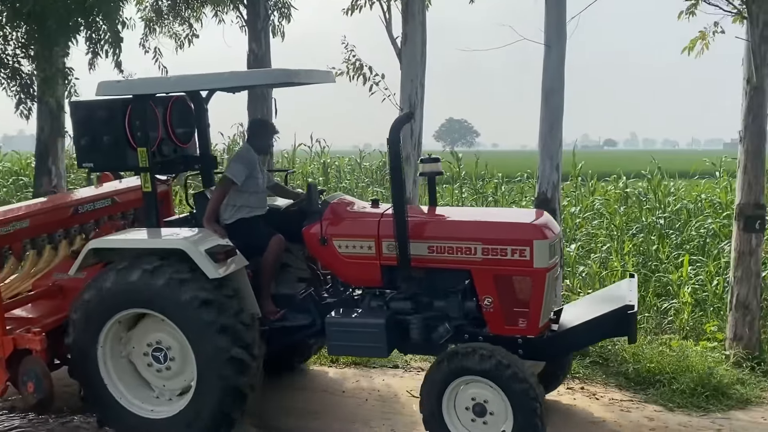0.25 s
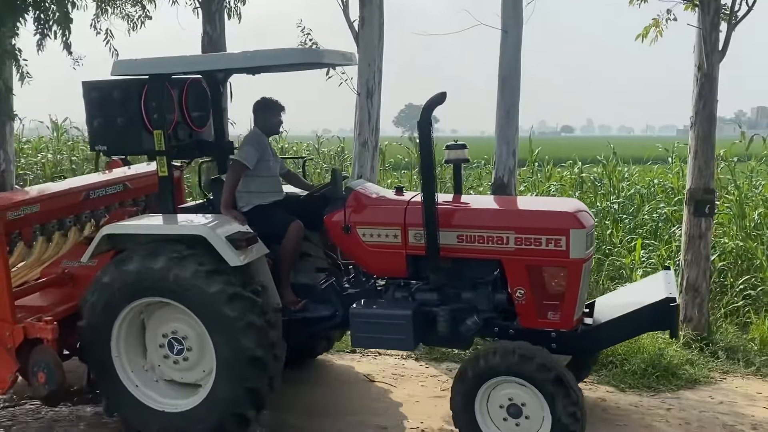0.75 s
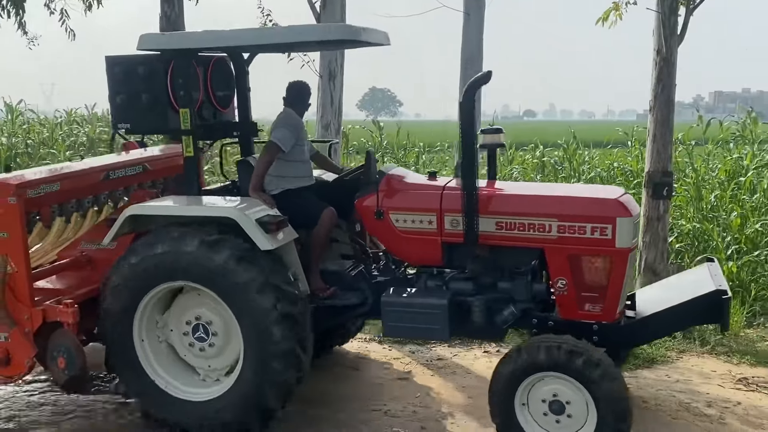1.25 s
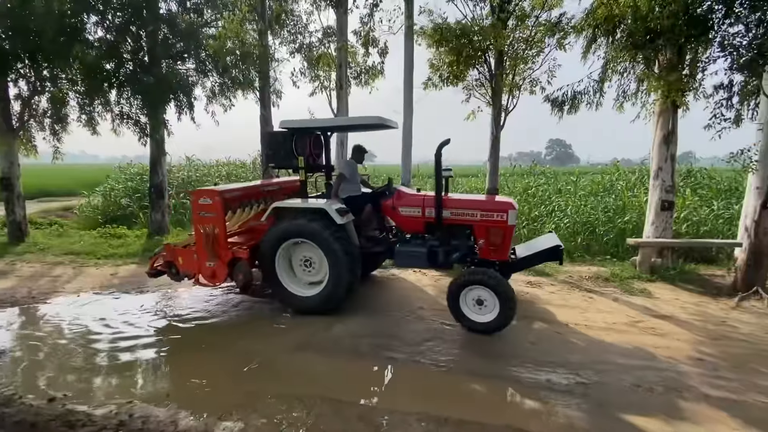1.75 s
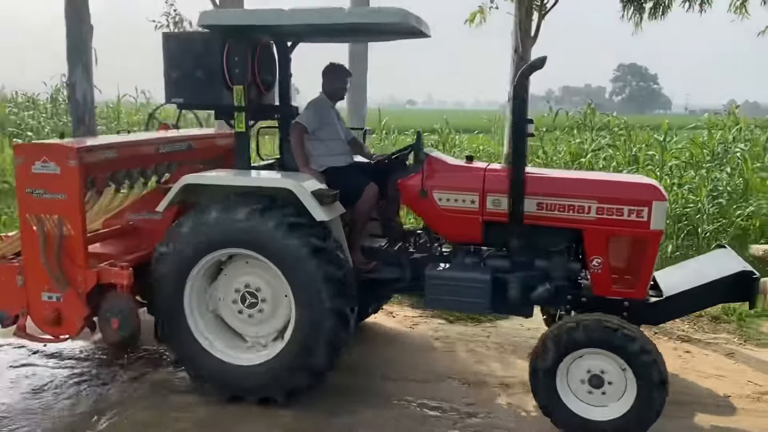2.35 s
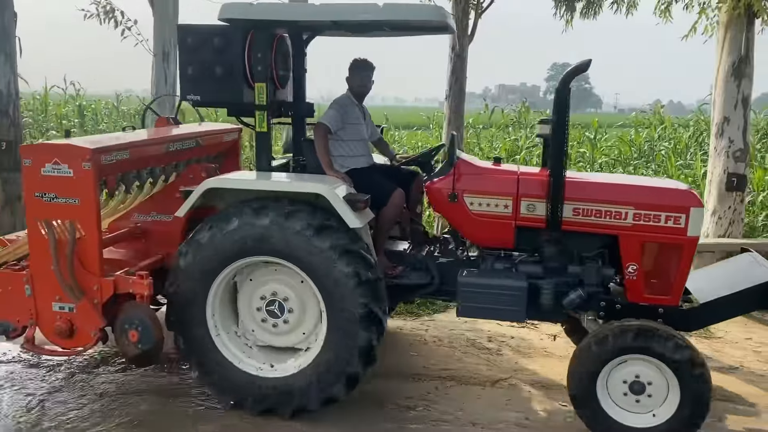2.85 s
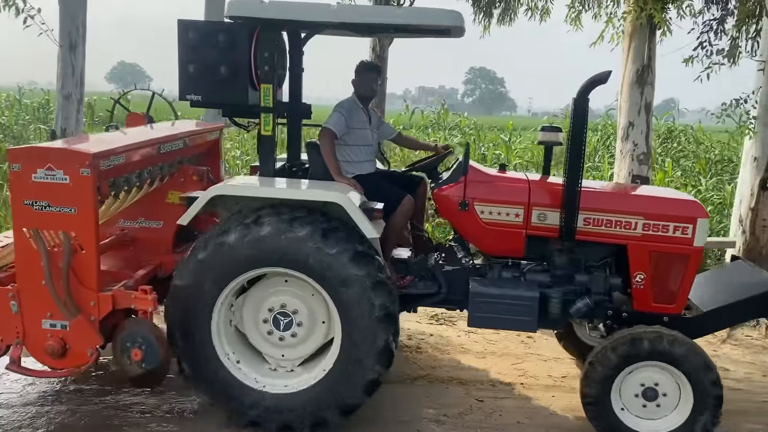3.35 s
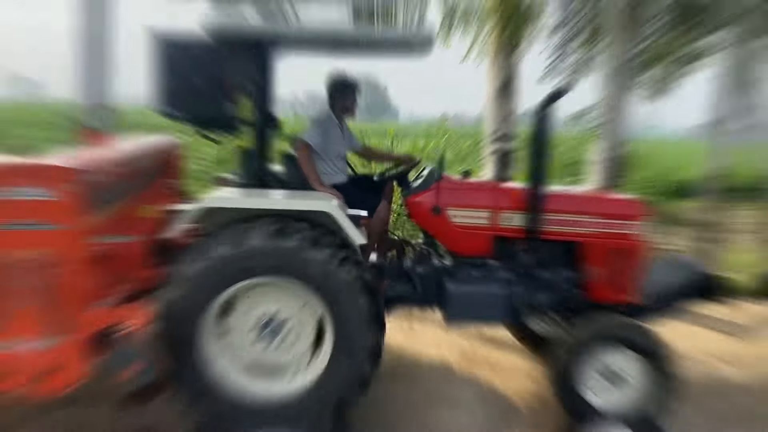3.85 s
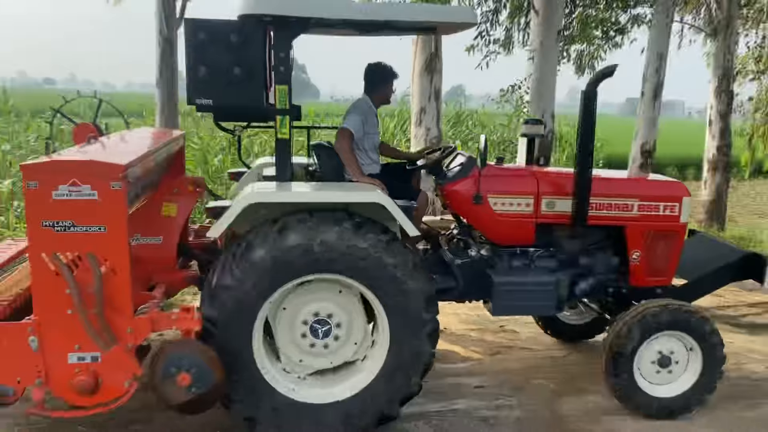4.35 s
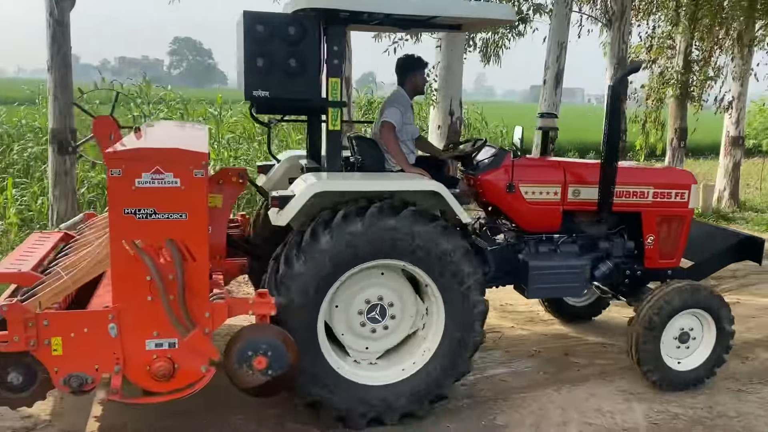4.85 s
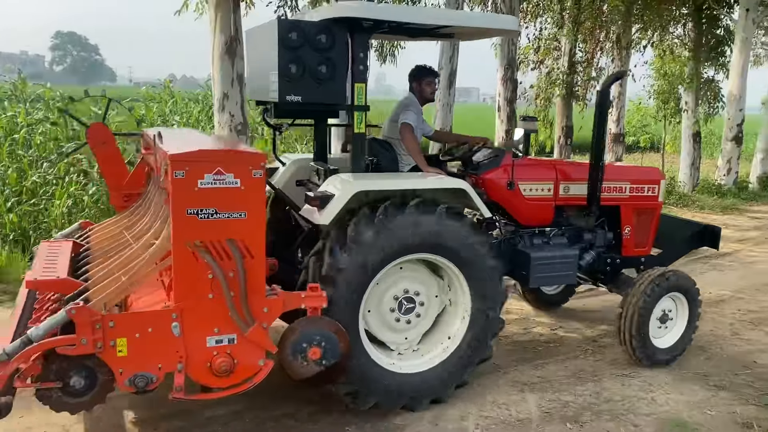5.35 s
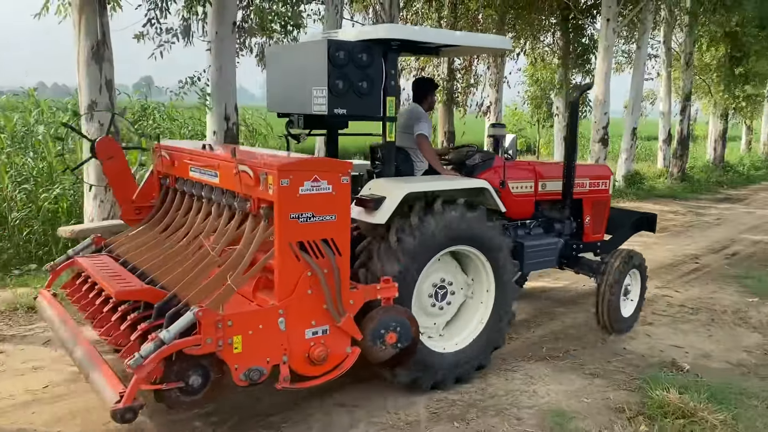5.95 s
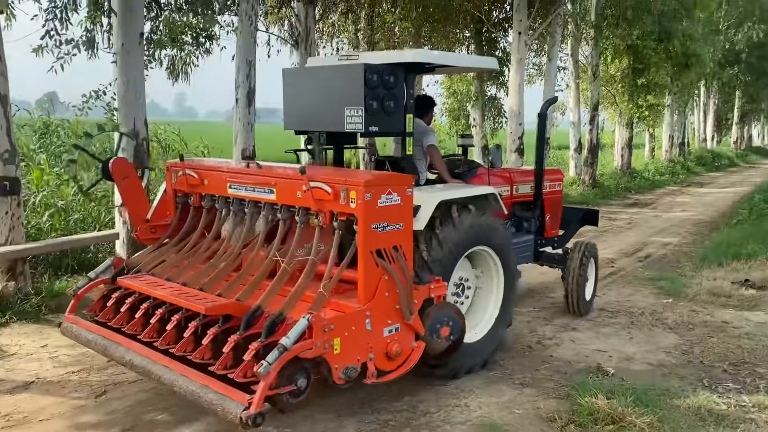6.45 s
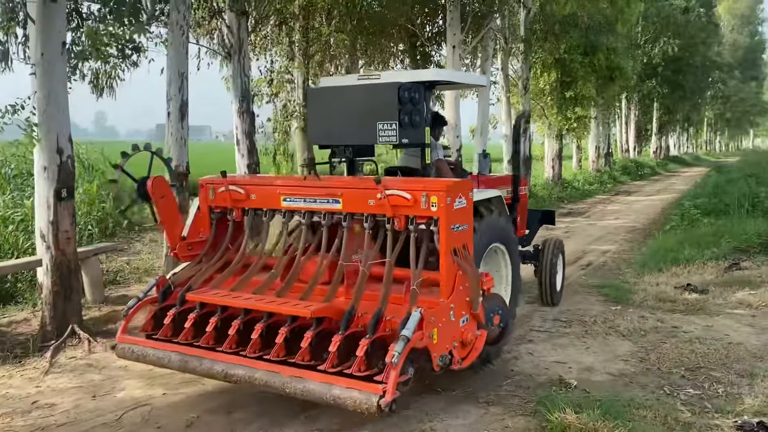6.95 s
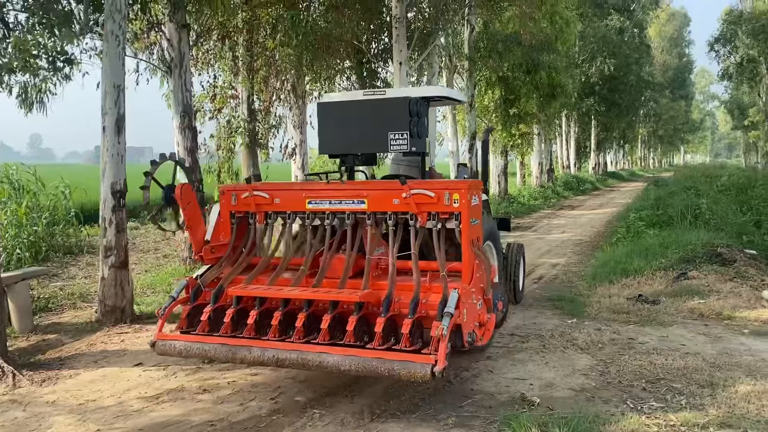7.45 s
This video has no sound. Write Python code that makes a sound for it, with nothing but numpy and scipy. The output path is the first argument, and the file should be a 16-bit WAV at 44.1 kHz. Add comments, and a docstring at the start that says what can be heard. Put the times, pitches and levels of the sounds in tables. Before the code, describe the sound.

A slow diesel engine hunts at low speed, bursts of loud, slightly overloaded metallic knocking alternating with softer coasting. Tyres throw brief soft splashes of puddle water. After a tiny midway gap the engine runs faster, surges less strongly, then hums and chugs steadily with a low exhaust boom. Gears, fan and air whirr throughout, valves tick thinly, and towed steel parts clank near the end. Close stereo phone pickup in open air, no echo.

```python
"""Outdoors, close to a phone's two microphone ports, a three-cylinder diesel tractor crawls past with a seed drill.
At first tyres splash (swells of noise) and the governor hunts: surges of firings knock in the block (noise bursts
through ringing modes) and thud in the exhaust (multiples of the firing rate), then it coasts; loud knocks overload.
Firings quicken around a short cut at 4 s, then settle; the tractor turns away, and late on the drill clanks (rung noise).
Throughout, valves tick (short treble bursts), and gears, fan, pump, tyres, air and spray whirr and hiss (drifting noise)."""
import sys
import numpy as np
from scipy import signal
from scipy.fft import rfft, irfft
from scipy.io import wavfile
from scipy.ndimage import uniform_filter1d

SR = 44100
rng = np.random.default_rng(int(sys.argv[2]) if len(sys.argv) > 2 else 0)


def waveform_to_disk(signal):
    """Save audio, clipped to [-1, 1], as 16-bit WAV at the path in sys.argv[1]."""
    frames = np.transpose(np.atleast_2d(signal))
    scaled = np.clip(frames, -1, 1) * 32767
    samples = np.round(scaled).astype(np.int16)
    wavfile.write(sys.argv[1], SR, samples)


N = 338688

# governor opening the fuel: (start [s], length [s], pipe thud [dB], silencer boom [dB],
# swell from start to end [dB], sizzle re knock, for a knock at 0 dB [dB])
FUEL_SURGES = [(.09, 0.16, -12.5, -16, 8.5, -18), (0.47, .19, -11, -16.5, -1, -17),
               (0.893, 0.11, -8, -13, -1.5, -18.5), (1.444, 0.15, -17.5, -19, -1, -19.5),
               (1.819, .19, -15, -16, -3, -18), (2.093, 0.2, -14, -18, 1, -19),
               (2.626, 0.095, -13, -11.5, 12, -18), (3.289, 0.29, -11, -14.5, 0.5, -20.5),
               (3.733, 0.16, -11, -15, -11, -19.5), (4.046, 0.1918, -12, -14, -0.5, -19.5),
               (4.466, .14, -13.5, -15.5, -5, -23.5), (4.79, 0.12, -16.5, -21.5, -6, -26),
               (5.06, 0.15, -12, -14, -5.5, -23), (5.302, 0.25, -12, -13.5, -3.5, -22)]
# firings that knock hard: (time [s], knock level [dB], knock centre [Hz])
HARD_FIRINGS = [(.049, -14, 1470), (.104, -19, 1810), (.169, -6, 2120), (.238, -17, 1360),
                (.455, -15, 1390), (.507, -11.5, 1560), (.574, -10.5, 1540), (.64, -7, 1400),
                (.73, -14.5, 1370), (.8, -16.5, 1940), (.873, -12, 1400), (.923, -6.5, 1540),
                (.99, -8.5, 1420), (1.2, -16, 1800), (1.268, -10, 1300), (1.334, -13, 1370),
                (1.4, -13, 1520), (1.471, -14, 1330), (1.53, -16, 1430), (1.595, -18, 1590),
                (1.662, -13.5, 1240), (1.731, -11.5, 1240), (1.803, -17, 1750), (1.85, -6, 1510),
                (1.918, -6.5, 1800), (1.984, -8, 1750), (2.052, -15.5, 1330), (2.126, -9, 1650),
                (2.191, -4.5, 1980), (2.252, -5, 1600), (2.536, -12, 1220), (2.599, -12.5, 1690),
                (2.653, -12.5, 1470), (2.708, -9.5, 1870), (2.91, -21, 1600), (3.107, -17, 1260),
                (3.175, -18, 1640), (3.311, -13.5, 1220), (3.359, -15, 1990), (3.418, -12.5, 1800),
                (3.471, -7, 1760), (3.527, -9, 1810), (3.58, -11.5, 1330), (3.706, -12, 1800),
                (3.751, -5.5, 1870), (3.806, -5.5, 2150), (3.861, -9, 1850), (4.032, -15, 1730),
                (4.072, -15, 2140), (4.12, -3.5, 1890), (4.168, -5.5, 1630), (4.214, -10, 1920),
                (4.256, -11.5, 1580), (4.448, -17.5, 1700), (4.501, -19.5, 1510), (4.543, -17, 1610),
                (4.59, -20.5, 1480), (4.635, -20, 1470), (4.721, -15, 1601), (4.856, -18, 1490),
                (5.077, -20, 1757), (5.108, -12, 1760), (5.152, -11.5, 1400), (5.195, -14, 1770),
                (5.326, -18.5, 1510), (5.371, -13, 1760), (5.414, -6.5, 1300), (5.455, -8, 1960),
                (5.496, -11.5, 1640), (5.551, -21, 1350), (5.591, -16, 1340)]
# engine speed: (time [s], firing rate [1/s])
FIRING_RATE = [(0, 15), (3.3, 15), (3.8, 17.5), (4.03, 22), (5.718, 24.6), (6.2, 24.4), (6.4, 23.6),
               (6.7, 23.8), (7.2, 23.9), (7.68, 24.3)]
# engine between and after the surges: (time [s], knock [dB], pipe thud [dB], silencer boom [dB],
# whirr [dB], hiss [dB])
STEADY_LEVELS = [(0, -43, -25, -34, -21.5, -32.5), (.8, -37, -26, -30, -21, -31.5),
                 (1.25, -15, -19, -28.5, -20.5, -34), (1.75, -22, -29, -27, -18, -28.5),
                 (2.4, -33, -23.5, -31, -20.5, -34.5), (2.95, -36, -25, -30, -21, -35),
                 (3.65, -30, -22, -27, -18, -31), (4.33, -28, -23, -31.5, -21.5, -37),
                 (4.7, -19.5, -18.5, -25.5, -18.5, -34.5), (5.25, -22, -25, -24.5, -17, -34.5),
                 (5.7, -16.5, -16.5, -20.5, -17.5, -33), (6.1, -20.5, -20, -21.5, -21.5, -38.5),
                 (6.6, -22, -20, -27, -20, -37), (6.95, -32.5, -19, -26, -21.5, -39.5),
                 (7.3, -23.5, -13.5, -20.5, -18.5, -35), (7.68, -22.5, -18.5, -31, -20.5, -41.5)]
# ringing of the engine block: (frequency [Hz], width [Hz], level [dB])
BLOCK_MODES = [(619, 99, 5), (797, 80, -6.5), (1080, 120, 4), (1270, 92, 1), (1500, 166, -3.5),
               (1790, 176, -1.5), (2012, 68, 3), (2297, 120, 6.5), (2620, 110, 1.5), (3130, 340, -10),
               (3450, 300, 1)]
# treble colour of knocks and valve ticks: (frequency [Hz], level [dB])
SIZZLE_COLOUR = [(2500, -32), (3500, -4), (5000, -9.5), (7500, -4), (9000, -17), (10800, -3.5),
                 (13000, -17.5), (16000, -25)]
# exhaust pipe resonances: (frequency [Hz], width [Hz], relative level [dB])
PIPE_MODES = [(47.7, 7.8, 6), (71.7, 8.6, -4.5), (95, 11.6, -12.5), (182, 47, -10)]
# silencer resonances, each passed twice: (frequency when cool [Hz], width of one pass [Hz], relative level [dB])
SILENCER_MODES = [(246, 21.3, 10.5), (335.5, 103, -12), (403.5, 75, -10.5)]
# modes heard as the tractor turns its side and then its back, each passed twice:
# (frequency [Hz], width of one pass [Hz], relative level [dB])
TURNING_MODES = [(145, 17, 0), (102.5, 48, -4.5), (495.2, 47, 1.5)]
# the turn: (time [s], first two turning modes re thud [dB], third mode re boom [dB],
# shading of the engine by the drill [dB])
TURN_LEVELS = [(0, -13.5, -20, -1), (2.5, -9.5, -19, 0.5), (4.3, -9, -12.5, -2), (4.6, -7, -5, -3),
               (6.1, -7, -4.5, -2.5), (6.4, -6, -23, -3.5), (6.9, -2.5, -22, -1.5), (7.68, 0, -15, -7)]
# whirr of gears, fan, pump and tyres: (frequency [Hz], relative density [dB per Hz])
WHIRR_COLOUR = [(30, -58), (55, -2.5), (110, -11), (220, -12), (380, -11), (520, -17.5), (620, -26),
                (760, -21.5), (1080, -17), (1600, -20.5), (2300, -21.5), (2800, -26), (3200, -39),
                (3750, -32), (4400, -45.5), (8000, -73)]
# air and spray: (frequency [Hz], relative density [dB per Hz])
HISS_COLOUR = [(2500, 1.5), (4000, 0), (6000, -5), (8000, -5.5), (8900, -35), (9900, -12), (11000, -15.5),
               (12300, -21), (13200, -40), (16000, -38)]
# steel drill parts meeting: (time [s], ring level [dB], ring frequency [Hz], decay by 60 dB [s], scrape level [dB])
DRILL_CLANKS = [(6.81, -26, 2290, 0.068, -52), (6.84, -28, 2340, .07, -48), (6.868, -25, 2246, 0.051, -33),
                (6.912, -25, 2280, 0.056, -47), (7.418, -35, 10800, 0.24, -29)]
# tyres throwing puddle water: (time [s], peak level [dB], length [s])
PUDDLE_SPLASHES = [(0.09, -29, 0.067), (1.424, -25.5, 0.062), (2.047, -22.5, 0.094), (2.418, -21, 0.041),
                   (2.612, -19, 0.039)]
# likeness of the two microphone ports: (frequency [Hz], left-right likeness [0-1])
PORT_LIKENESS = [(60, 1), (130, 0.98), (290, 0.98), (640, 0.91), (1420, 0.76), (3130, 0.6), (5000, 0.71),
                 (8000, 0.69), (12000, 0.36)]
# level lean between the ports: (frequency [Hz], left minus right [dB])
PORT_LEAN = [(60, -2), (130, -2.0), (290, -2.0), (640, -1.0), (1420, 1), (3130, 2.5), (5000, 3.5),
             (8000, 0.5)]
# phase lead between the ports: (frequency [Hz], left ahead of right [rad])
PORT_LEAD = [(0, 0.79), (1120, 0.2), (1980, -0.72), (2500, 0.42), (3270, -1.5), (5000, -0.82),
             (8000, -1.48), (12000, -1.2)]
# short cut in the sound: (time [s], gain [ratio])
CUT_GAIN = [(0, 1), (3.9, 0.99), (3.961, 0.43), (3.963, 0.01), (4.008, 0.0014), (4.03, 0.43), (4.07, 1),
            (7.68, 0.84)]

SPAN = 8192  # samples in one burst
HZ = np.fft.rfftfreq(SPAN, 1 / SR)
STEP = 64  # samples between the points where the exhaust is computed
BAND_LIMIT_HZ = 15700
SETTLED_S = 5.718  # from here the engine runs evenly
FUEL_RISE_S, FUEL_FALL_S = 0.03098, 0.03
EARLY_S = 0.012  # a fuelled firing knocks this much sooner in its cycle
SOFT_HZ, SOFT_FALL_HZ_PER_S = 1590, 66  # centre of soft knocks, duller as the tractor turns away
COAST_SIZZLE_DB = -30.5  # sizzle re knock without fuel
SIZZLE_LAG = 0.28  # under fuel, sizzle re knock drops this many dB per dB of knock
BLOCK_LATE_S, BLOCK_LATE_HZ = 0.005004, 1490  # heavy parts, ringing below this frequency, answer a blow later
THUD_LATE_S, THUD_LINGER_S, BOOM_LINGER_S = 0.023, 0.047, 0.004  # long pipe fills late; exhaust outlasts fuel
WHIRR_LIFT_DB, HISS_LIFT_DB, LIFT_LATE_S = 2.5, 3.5, 0.049  # gears and fan work harder under fuel
SHAKE_DB = 4.5  # how much each firing shakes up the gears


def firings():
    """Soft firings share out the gaps between hard ones, then follow the settled rate; fuel sets sizzle, thud and boom."""
    hard_s = np.transpose(HARD_FIRINGS)[0]
    crank_s = np.r_[hard_s + EARLY_S * fuel(hard_s), SETTLED_S]
    gaps = np.diff(crank_s)
    expected = gaps * np.interp(crank_s[1:], *np.transpose(FIRING_RATE))
    counts = np.maximum(np.round(expected), 1).astype(int)
    between = np.concatenate([start + gap * np.arange(1, count) / count
                              for start, gap, count in zip(crank_s, gaps, counts)])
    turns = np.cumsum(curve(FIRING_RATE) * (np.arange(N) >= SETTLED_S * SR)) / SR
    settled = np.flatnonzero(np.diff(np.ceil(turns))) / SR
    first = crank_s[0] - 1 / FIRING_RATE[0][1]
    soft_s = np.r_[first, between - EARLY_S * fuel(between), settled]

    at, steady_knock_db, steady_thud_db, steady_boom_db = np.transpose(STEADY_LEVELS)[:4]
    soft_db = np.interp(soft_s, at, steady_knock_db)
    soft = np.transpose([soft_s, soft_db, SOFT_HZ - SOFT_FALL_HZ_PER_S * soft_s])
    soft = soft + rng.standard_normal((len(soft_s), 3)) * [0.0006, 0.9, 90]  # chance in s, dB, Hz
    rows = np.vstack([HARD_FIRINGS, soft])
    s, knock_db, centre_hz = rows[np.argsort(rows[:, 0])].T

    share, run = opening(s)
    surge_thud_db, surge_boom_db, swell_db, sizzle_db = np.transpose(FUEL_SURGES)[2:, :, None]
    fuelled_db = sizzle_db - SIZZLE_LAG * knock_db
    treble_db = COAST_SIZZLE_DB + (share * (fuelled_db - COAST_SIZZLE_DB)).sum(0)

    def exhaust_level(steady_db, surge_db, late, linger):
        lean_db = np.interp(s, at, steady_db)
        swollen_db = surge_db + swell_db * (run - 0.5)
        return lean_db + (opening(s - late, linger)[0] * (swollen_db - lean_db)).max(0)

    thud_db = exhaust_level(steady_thud_db, surge_thud_db, THUD_LATE_S, THUD_LINGER_S)
    boom_db = exhaust_level(steady_boom_db, surge_boom_db, 0, BOOM_LINGER_S)
    uneven_db = rng.standard_normal((len(s), 3)) * [1.6, 0.9, 1.2]
    return s, knock_db, centre_hz, *(np.array([treble_db, thud_db, boom_db]) + uneven_db.T)


def opening(t, linger_s=0):
    """How far the fuel is open in each surge at times t, 0 to 1, and how far the surge has run, 0 to 1."""
    start, length = np.transpose(FUEL_SURGES)[:2, :, None]
    rise = (t - start) / FUEL_RISE_S + 0.5
    fall = (start + length + linger_s - t) / FUEL_FALL_S + 0.5
    return np.clip(np.minimum(rise, fall), 0, 1), np.clip((t - start) / length, 0, 1)


def fuel(t):
    """Fuel opening of the most open surge at times t."""
    return opening(t)[0].max(0)


def knocks(s, knock_db, centre_hz, treble_db):
    """Combustion hits the block, then the piston slaps its bore; fuelled blows sizzle brightly, unfuelled ones faintly."""
    count = len(s)
    blow = ports(*bursts(count, 0.0028, 0.014, 0.026, -6.5, 2.46), HZ) * block(centre_hz, 3.8)
    slap = ports(*bursts(count, 0.0025, 0.008, 0.02, -10, 3.5), HZ) * block(0.8 * centre_hz, 4.0)
    slap_late = rng.uniform(0.3, 0.52, count) * np.gradient(s)  # a share of the firing cycle
    slap_weaker_db = 9.4 + 6.7 * rng.exponential(size=count)
    sizzle = ports(*bursts(count, 0.008, 0.013, 0.024, -8, 1.1), HZ) * amp(read(SIZZLE_COLOUR, HZ))
    return (place(s - 0.0045, blow, knock_db, 0.016)
            + place(s + slap_late, slap, knock_db - slap_weaker_db, 0.021)
            + place(s - 0.007, sizzle, knock_db + treble_db, 0.034))


def block(centre_hz, spread_db):
    """Each blow excites the block's modes by other amounts, around its centre; cast iron passes little treble."""
    hz, width, db = np.transpose(BLOCK_MODES)
    uneven_db = spread_db * rng.standard_normal((len(centre_hz), len(hz)))
    off_centre_db = 15.4 * np.log2(hz / centre_hz[:, None]) ** 2
    share = amp(db + uneven_db - off_centre_db)
    modes = np.array([ring(f, w) for f, w in zip(hz, width)])
    delay_s = BLOCK_LATE_S / (1 + (HZ / BLOCK_LATE_HZ) ** 4)
    late = np.exp(-2j * np.pi * np.cumsum(delay_s) * SR / SPAN)
    return share @ modes * late / (1 + 1j * HZ / 5200) ** 6


def exhaust(s, thud_db, boom_db):
    """Multiples of the firing rate sound where pipe and silencer ring; hot gas and a warming pipe lift the boom's pitch."""
    t = np.arange(N) / SR
    coarse = t[::STEP]
    turns = np.interp(t, np.r_[s, s[-1] + 1], np.r_[np.arange(len(s)), len(s) + 23])
    rate = smooth_twice(np.gradient(turns), 4400)  # the flywheel evens the crank speed
    turns = np.cumsum(rate) + 0.0547
    order = np.arange(1, 27)[:, None]
    hz = order * rate[::STEP] * SR
    thud_db = np.interp(coarse, s + 0.024, thud_db)
    boom_db = np.interp(coarse, s + 0.024, boom_db)

    gas_heat = 0.0038 * (smooth_twice(boom_db, 60) + 11.0)
    pipe_heat = 0.0068 * (coarse - 4) + 0.029 * np.maximum(coarse - 6.2, 0)
    heat = 1 + gas_heat + pipe_heat
    pipe = sum(amp(db) * ring(f, w, hz) for f, w, db in PIPE_MODES) / (1 + 1j * hz / 150)
    silencer = sum(amp(db) * ring(f * heat, w, hz) ** 2 for f, w, db in SILENCER_MODES) / (1 + 1j * hz / 900)
    # even out the resonances, so that thud and boom levels set the loudness
    pipe, silencer = (r / np.sqrt((abs(r) ** 2).sum(0) / 2) for r in (pipe, silencer))

    *backs, side = (amp(db) * ring(f, w, hz) ** 2 for f, w, db in TURNING_MODES)
    back = amp(curve(TURN_LEVELS)[::STEP]) * sum(backs)
    side = amp(curve(TURN_LEVELS, column=2)[::STEP]) * side
    lines = -amp(thud_db) * (pipe + back) - amp(boom_db) * (silencer + side)
    # turbulence makes each multiple waver, the higher ones more
    waver = uniform_filter1d(rng.standard_normal((2,) + hz.shape), size=36, axis=2) * 6
    lines = lines * (1 + (0.07 + 0.009 * order) * (waver[0] + 1j * waver[1]))
    sound = sum((np.interp(t, coarse, line) * np.exp(2j * np.pi * k * turns)).real
                for k, line in zip(order, lines))
    spectrum = rfft(sound)
    return irfft(ports(spectrum, 2.1j * spectrum, np.fft.rfftfreq(N, 1 / SR)), N)


def valves(s):
    """A valve seats with a thin tick between firings."""
    at = s[:-1] + 0.41 * np.minimum(np.diff(s), 0.08)
    colour = amp(read(SIZZLE_COLOUR, HZ)) * ring(11200, 3200) ** 2
    tick = ports(*bursts(len(at), 0.0021, 0.0052, 0.022, -2), HZ) * colour
    shade_db = 0.55 * curve(TURN_LEVELS, column=3)[(abs(at) * SR).astype(int)]
    return place(at, tick, -47 + shade_db + 2.4 * rng.standard_normal(len(at)), 0.021)


def whirr(s):
    """Gears, fan and pump below, shaken up by each firing; air and spray above."""
    t = np.arange(N) / SR
    cycle = np.interp(t - 0.004, s, np.arange(len(s))) % 1
    shake_db = uniform_filter1d(SHAKE_DB * (0.5 - cycle), size=250)
    load = fuel(t - LIFT_LATE_S)
    gears_db = curve(STEADY_LEVELS, column=4) + WHIRR_LIFT_DB * load + shake_db
    hiss_db = curve(STEADY_LEVELS, column=5) + HISS_LIFT_DB * load
    gears = patchy(WHIRR_COLOUR, gears_db, 2.53, 1.43, curve(TURN_LEVELS, column=3))
    return gears + patchy(HISS_COLOUR, hiss_db, 2.5, 1.0)


def drill():
    """Steel parts of the drill in tow meet: a scrape of noise and one ringing mode."""
    s, db, hz, t60, scrape_db = np.transpose(DRILL_CLANKS)
    blow = ports(*bursts(len(s), 0.0013, 0.0089, 0.033, -1), HZ)
    width = np.log(1000) / np.pi / t60[:, None]
    rings = blow * ring(hz[:, None], width)
    return place(s, rings, db, 0.035) + place(s, blow * ring(2200, 4600), scrape_db, 0.023)


def splashes():
    """Tyres throw puddle water: soft swells of treble noise."""
    t = np.arange(N) / SR
    swell = sum(amp(db) * np.exp(-((t - s - length / 2) / length * 2) ** 2) for s, db, length in PUDDLE_SPLASHES)
    return swell * patchy(HISS_COLOUR, 0, 2.6, 2.2)


def patchy(colour, level_db, patchy_db, flicker_db, shade_db=0.):
    """Noise with drifting patches, a quick flicker shared over all bands and a shading of its upper part."""
    frames, hz = N // 256 + 5, np.fft.rfftfreq(1024, 1 / SR)[:, None]
    a, b, c, d, patches = rng.standard_normal((frames, 513, 5)).T
    patches = uniform_filter1d(uniform_filter1d(patches, size=8, axis=0), size=8, axis=1) * 8
    shade_db = np.interp(np.arange(frames) * 256, np.arange(N), shade_db * np.ones(N))
    shade_db = shade_db / (1 + (1200 / (hz + 1)) ** 4)  # the bass bends round
    flicker = flicker_db * rng.standard_normal(frames)
    gain = amp(read(colour, hz) + patchy_db * patches + flicker + shade_db)
    spectra = ports(a + 1j * b, c + 1j * d, hz) * gain
    x = signal.istft(spectra, nperseg=1024, noverlap=768)[1][:, :N]
    return x / x.std() * amp(level_db)


def bursts(count, rise, fall, tail, tail_db, grain_db=0.):
    """Spectra of two sets of noise bursts: quick rise, rounded top, abrupt fall, weaker slow tail, 3 ms grains."""
    t = np.arange(SPAN) / SR
    body = np.exp(-(t / fall) ** 2) + amp(tail_db) * np.exp(-t / tail)
    shape = (1 - np.exp(-t / rise)) ** 2 * body
    grains = amp(grain_db * np.repeat(rng.standard_normal((count, 1, SPAN // 128)), 128, axis=2))
    noise = rng.standard_normal((count, 2, SPAN)) * shape * grains
    return rfft(noise[:, 0]), rfft(noise[:, 1])


def ring(hz, width, at=HZ):
    """Response of one damped mode, 1 at its peak."""
    return 1j * at * width / (hz ** 2 - at ** 2 + 1j * at * width)


def place(times, spectra, db, heard):
    """Lay each sound at its time [s], its energy set to that of level db held for heard seconds."""
    sounds, out = irfft(spectra), np.zeros((2, N + SPAN))
    for s, sound, level in zip(times, sounds.swapaxes(0, 1), amp(db)):
        energy = np.sum(sound ** 2) / 2
        at = min(max(round(s * SR), 0), N)
        out[:, at:at + SPAN] += sound * level * np.sqrt(heard * SR / energy)
    return out[:, :N]


def ports(first, second, hz):
    """Two microphone ports hear one spectrum partly alike, with a lean and a lead."""
    same = np.clip(read(PORT_LIKENESS, hz), 0, 1)
    lean = amp(read(PORT_LEAN, hz) / 2) * np.exp(0.5j * read(PORT_LEAD, hz))
    right = same * first + np.sqrt(1 - same ** 2) * second
    return np.array([lean * first, right / lean])


def amp(db):
    """Amplitude ratio of a level in dB."""
    return 10 ** (np.asarray(db) / 20)


def read(points, hz):
    """Read a table over frequency, on a logarithmic axis."""
    f, value = np.transpose(points)
    return np.interp(np.log(hz + 1), np.log(f + 1), value)


def curve(points, column=1):
    """Read a table over time, at every sample."""
    rows = np.array(points)
    return np.interp(np.arange(N) / SR, rows[:, 0], rows[:, column])


def smooth_twice(values, size):
    """Running mean over size points, taken twice."""
    once = uniform_filter1d(values, size, mode="nearest")
    return uniform_filter1d(once, size, mode="nearest")


def scene():
    """The engine passing by, the drill in tow and the wet ground."""
    s, knock_db, centre_hz, treble_db, thud_db, boom_db = firings()
    engine = knocks(s, knock_db, centre_hz, treble_db) + exhaust(s, thud_db, boom_db) + valves(s) + whirr(s)
    return engine + drill() + splashes()


def record(dry):
    """The microphone drops the deepest bass; overload clips peaks; the sound fades out and in at the cut; band limit."""
    heard = signal.sosfilt(signal.butter(5, 39 / SR * 2, "high", output="sos"), dry)
    clipped = np.clip(heard, -1, 1) * curve(CUT_GAIN)
    band = signal.firwin(511, BAND_LIMIT_HZ, window=("kaiser", 9), fs=SR)
    return signal.oaconvolve(clipped, band[None], "same")


dry = scene()
out = record(dry)
waveform_to_disk(out)
```